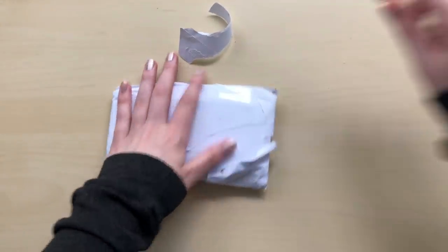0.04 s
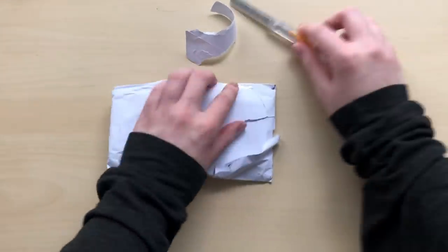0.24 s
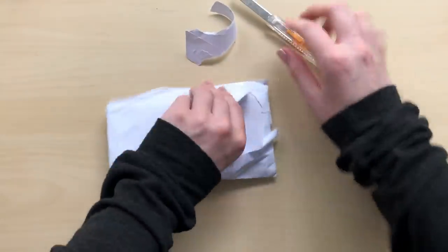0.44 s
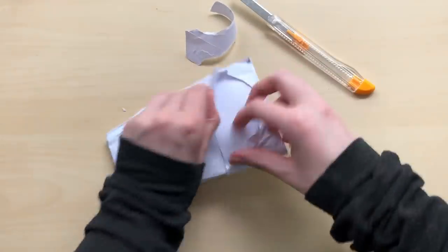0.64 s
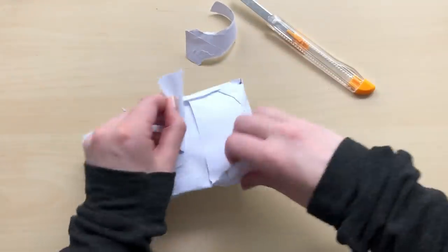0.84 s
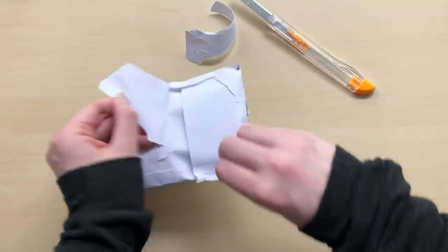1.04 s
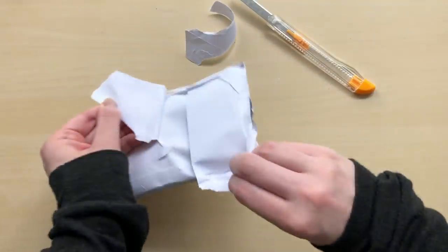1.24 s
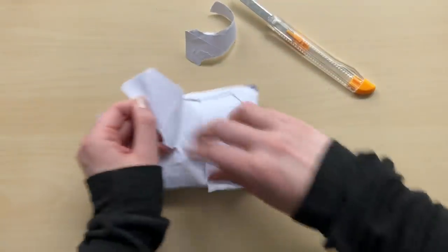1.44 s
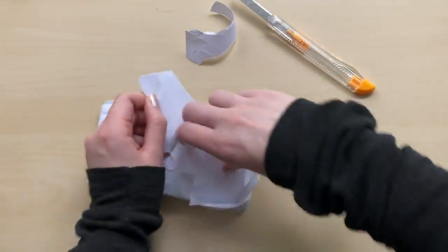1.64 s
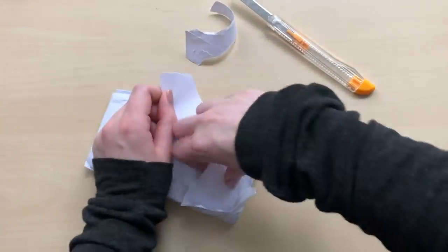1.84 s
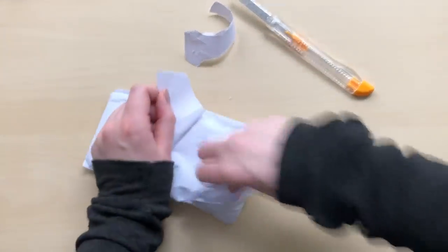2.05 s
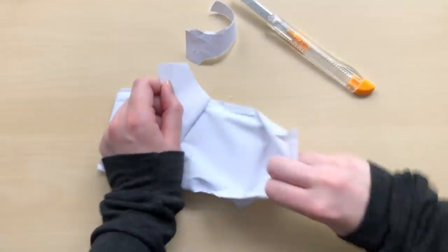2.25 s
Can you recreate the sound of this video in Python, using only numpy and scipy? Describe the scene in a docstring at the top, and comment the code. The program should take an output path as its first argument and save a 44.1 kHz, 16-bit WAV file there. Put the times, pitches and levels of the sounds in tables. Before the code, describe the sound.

A paper mailer is torn open on a wooden desk after a plastic knife clatters down

```python
"""Opening a paper mailer at a desk

Hands tear open a paper mailer on a wooden desk in a small quiet room. Paper rustles and rips as dense
filtered clicks and snaps at its creases as sinking, noisy pops; packet and fingers knock the hollow desk
top, a bank of damped modes. A plastic knife drops on the desk and bounces: cracks, ringing modes, chatter."""
import sys
import numpy as np
from scipy import signal
from scipy.io import wavfile

SR = 44100
rng = np.random.default_rng(int(sys.argv[2]) if len(sys.argv) > 2 else 0)


def put_to_file(sound):
    """Save the sound as 16-bit audio at rate SR, in the file named by the first command-line argument."""
    columns = np.atleast_2d(sound).T  # one column per channel
    safe = np.clip(columns, -1, 1)
    whole_steps = np.round(safe * 32767)
    wavfile.write(sys.argv[1], SR, whole_steps.astype(np.int16))


N = 101518   # samples


def amp(db):
    """Decibel law: level in dB to amplitude gain."""
    return 10 ** (np.asarray(db) / 20)


def rms_one(x):
    """Power normalisation: scale to rms 1."""
    return x / np.sqrt(np.mean(x ** 2) + 1e-20)


def drift(hz):
    """Low-passed noise: a smooth random wander of rms 1, by two equal poles at hz."""
    pole = np.exp(-2 * np.pi * hz / SR)
    settle = 9000   # samples dropped while the filter settles
    noise = rng.standard_normal(N + settle)
    return rms_one(signal.lfilter([1], [1, -2 * pole, pole * pole], noise)[settle:])


def ring(clicks, hz, t60):
    """Damped resonance: each unit click starts a sine that dies by 60 dB in t60 seconds."""
    radius = amp(-60 / (t60 * SR))
    angle = 2 * np.pi * hz / SR
    feedback = [1, -2 * radius * np.cos(angle), radius * radius]
    return signal.lfilter([0, np.sin(angle)], feedback, clicks + 1e-18)


def butter(x, hz, kind, order=2):
    """Maximally flat filtering: a Butterworth filter."""
    return signal.sosfilt(signal.butter(order, hz, kind, fs=SR, output="sos"), x)


def colour(sources, spectrum, patch_db):
    """Spectral shaping: third-octave bands, each with its own level and flicker; rms 1."""
    hz, db = np.transpose(spectrum)
    edges = 25 * 2 ** np.arange(0, 9.5, 1 / 3)
    out = 0
    for k, (low, high) in enumerate(zip(edges, edges[1:])):
        if hz[0] <= high and low <= hz[-1]:
            centre = np.log(low * high) / 2   # log of the geometric mean
            level = np.interp(centre, np.log(hz), db)
            flicker = patch_db * drift(52.3) if patch_db else 0
            # neighbouring bands take different sources
            out = out + amp(level + flicker) * butter(sources[k % 2], [low, high], "band")
    return rms_one(out)


def add(out, start, sound):
    """Superposition: mix a sound in at a sample."""
    out[start:start + len(sound)] += sound[:len(out) - start]


# spectrum of the quiet air: f/Hz, relative level per Hz/dB
AIR_SPECTRUM = [(15, -32), (25, -8), (123, -50), (206, 22), (2000, 11), (2760, 3.5), (3720, -23.5),
                (4030, 17.5), (16000, -6.5)]
AIR_DB, RUMBLE_DB = -64 + 4, -64   # rms
RUMBLE_BAND_HZ = [30, 120]


def quiet_air():
    """Stationary noise: a shaped hiss over a band of low rumble."""
    air = amp(AIR_DB) * colour(rng.standard_normal((2, N)), AIR_SPECTRUM, 0)
    rumble = rms_one(butter(rng.standard_normal(N), RUMBLE_BAND_HZ, "band"))
    return air + amp(RUMBLE_DB) * rumble


CRINKLES_PER_S, CRINKLE_SPREAD_DB = 400, 3
CRINKLE_CYCLES = 9.2   # cycles of ringing until 60 dB down


def crinkles():
    """Random excitation of resonators: small folds pop, each at one of 16 pitches; rms 1."""
    excess = np.minimum(rng.exponential(1, N), 4)
    sizes = amp(CRINKLE_SPREAD_DB * excess) * rng.choice([-1, 1], N)
    born = rng.random(N) < CRINKLES_PER_S / SR
    dealt = rng.integers(0, 16, N)   # which pitch each fold gets
    pops = 0
    for k, hz in enumerate(np.geomspace(700, 9000, 16)):
        pops = pops + ring(sizes * born * (dealt == k), hz, CRINKLE_CYCLES / hz)
    return rms_one(pops)


# pulls on the paper, each a rub or a rip:
# start t/s, length/s, starting body level/dB, starting treble level/dB, swell over the pull/dB
PULLS = [(.025, 0.0274, -61, -66.5, 10.5), (0.069, 0.1046, -48, -47, -6), (0.193, 0.1086, -49, -50, 6),
         (0.371, 0.0625, -48.5, -49, 17.5), (0.52, 0.116, -47.5, -50, -9),
         (.642, 0.0507, -49.5, -44.5, 10.5), (0.678, 0.0854, -41, -40.5, 0.5),
         (0.769, 0.06, -36, -33.5, -0.5), (0.829, 0.0323, -31.5, -29.5, 4),
         (0.882, 0.0365, -40.5, -41.5, 4), (0.909, 0.0609, -30, -29.5, -10.5),
         (1.008, 0.0086, -39, -42.5, 5.5), (1.033, 0.039, -44.5, -45, 7), (1.053, 0.1113, -33.5, -30, -9.5),
         (1.163, 0.1186, -40.5, -35, 7.5), (1.243, 0.0512, -32.5, -33, -6),
         (1.333, 0.072, -45, -42.5, -1.5), (1.402, 0.0374, -48, -45, 10.5),
         (1.464, 0.0496, -41.5, -46.5, -5), (1.55, 0.082, -50, -49, 6.5), (1.638, 0.013, -31, -26, -4.5),
         (1.656, 0.0633, -38, -43.5, -14), (1.713, 0.0405, -53, -57, 7), (1.762, 0.134, -41, -42.5, 0),
         (1.91, 0.0219, -39.5, -39, 3.5), (1.938, 0.099, -44.5, -45.5, 13.5),
         (2.057, 0.0192, -43.5, -36.5, 11.5), (2.073, 0.0403, -31.5, -30, 4),
         (2.122, 0.0328, -37.5, -41.5, 8), (2.166, 0.0565, -29, -28, 2), (2.245, 0.078, -37, -34.5, -9),
         (2.27, 0.0414, -29.5, -36.5, -3.5)]
# spectrum of the paper's body before the split: f/Hz, relative level per Hz/dB
BODY = [(88, -79.5), (150, -43.5), (290, 0), (352, -4), (598, -11.5), (969, -0.5), (1470, 3), (2270, 0.5),
        (7000, 6.5), (9100, -33.5), (15400, -120)]
# spectrum of the paper's treble before the split: f/Hz, relative level per Hz/dB
TREBLE = [(2650, -38), (4500, 19.5), (5680, 21.5), (8150, 7), (13900, -1), (16000, 8)]
SPLIT_HZ = 7660   # body below, treble above
GRAINS_PER_S, GRAIN_SPREAD_DB = 14000, 3.0   # rate in each of two streams
CLUMP_DB, CLUMP_HZ, PATCH_DB = 2.1, 140, 1.8   # rms wander of the grains, its corner, rms flicker per band
PULL_ATTACK_S, PULL_RELEASE_S = 0.00426, 0.0148   # linear rise, exponential time constant
CRINKLE_DB = -7.5   # relative to the body


def rustle():
    """Shot noise: fibres rub and break as dense, uneven, clumped clicks for as long as each pull lasts."""
    t = np.arange(N) / SR
    power = np.zeros((2, N))   # body, treble
    for start_s, length_s, body_db, treble_db, swell_db in PULLS:
        gone = np.clip(t - start_s, 0, length_s)
        attack = np.minimum(gone / PULL_ATTACK_S, 1)
        release = np.exp(-np.maximum(t - start_s - length_s, 0) / PULL_RELEASE_S)
        level = amp([[body_db], [treble_db]] + swell_db * gone / length_s)
        power += (level * attack * release) ** 2
    excess = np.minimum(rng.exponential(1, (2, N)), 6)
    sizes = amp(GRAIN_SPREAD_DB * excess) * rng.choice([-1, 1], (2, N))
    born = rng.random((2, N)) < GRAINS_PER_S / SR
    grains = sizes * born * amp(CLUMP_DB * drift(CLUMP_HZ))
    body = rms_one(butter(colour(grains, BODY, PATCH_DB), SPLIT_HZ, "low"))
    treble = rms_one(butter(colour(grains, TREBLE, PATCH_DB), SPLIT_HZ, "high"))
    body = body + amp(CRINKLE_DB) * crinkles()
    return np.sqrt(power[0]) * body + np.sqrt(power[1]) * treble


SNAP_RISE_S, SNAP_EDGE_S = .0005, .0013   # time constants
SNAP_SAG_PER_S = 22   # the pitch sinks by twice this fraction of itself each second
SNAP_GLIDE_HZ, SNAP_GLIDE_S = 1800, .0006   # the pitch starts this much higher; time constant of its fall
SNAP_NARROWNESS, SNAP_NOISE = 1.5, 1.1   # of the noise band; noise peak against tone
SNAP_TREBLE_HZ = 5500


def crack(start_s, db, hz, treble_db, length_s, noise):
    """Transient radiation: a noisy pop of falling pitch with a brief bright edge; start sample and sound."""
    t = np.arange(len(noise)) / SR
    rise = 1 - np.exp(-t / SNAP_RISE_S)
    fade = rise * np.exp(-2 * t / max(length_s, 5e-4))
    glide = SNAP_GLIDE_HZ * SNAP_GLIDE_S * (1 - np.exp(-t / SNAP_GLIDE_S))
    turns = hz * t * (1 - SNAP_SAG_PER_S * t) + glide
    tone = np.sin(2 * np.pi * turns) * (fade / fade.max()) ** 2
    band = [hz / (1 + 1 / SNAP_NARROWNESS), hz * (1 + 2 / SNAP_NARROWNESS)]
    hiss = butter(noise * fade, band, "band", order=1)
    body = tone + SNAP_NOISE * hiss / np.abs(hiss).max()
    edge = butter(noise * rise * np.exp(-t / SNAP_EDGE_S), SNAP_TREBLE_HZ, "high")
    pop = amp(db) * body / np.abs(body).max()
    return int(start_s * SR), pop + amp(treble_db) * edge / np.std(edge[:150])


# creases that snap: t/s, pop peak level/dB, settling f/Hz, bright edge rms level/dB, fade length/s
SNAPS = [(0.087, -31.5, 3793, -62.5, 0.0068), (0.105, -26, 1244, -56.5, 0.009),
         (0.145, -48.5, 1410, -56, 0.0021), (0.201, -37.5, 1280, -49, 0.0064),
         (0.227, -24.5, 854, -49, 0.009), (0.243, -29.5, 990, -58.5, 0.0013),
         (0.592, -38, 1010, -73.5, 0.0089), (0.64, -30.5, 982, -29.5, 0.0065),
         (0.652, -24.5, 1045, -49.5, 0.00384), (0.674, -21.5, 3090, -36, 0.00266),
         (0.698, -22, 1959, -26.5, 0.0043), (0.75, -32, 3040, -35, 0.0022),
         (0.787, -23.5, 1660, -31.5, 0.0059), (0.808, -31, 1640, -27.5, 0.0049),
         (0.818, -35, 750, -29.5, 0.00142), (0.834, -15.5, 4028, -23.5, 0.0028),
         (0.843, -25, 2310, -31, 0.001), (0.854, -15.5, 2083, -23.5, 0.0066),
         (0.889, -19, 4670, -33.5, 0.0042), (0.894, -22.5, 1287, -26.5, 0.0049),
         (0.902, -24.5, 920, -45.5, 0.00237), (0.926, -11, 867, -52.5, 0.00242),
         (0.969, -25.5, 3130, -33, 0.0035), (0.994, -35, 1060, -52.5, 0.0037),
         (1, -27.5, 886, -45.5, 0.0079), (1.013, -25.5, 690, -40.5, 0.0035),
         (1.015, -32.5, 1960, -34.5, 0.00136), (1.023, -27.5, 1018, -47, 0.009),
         (1.046, -17, 4270, -60, 0.00107), (1.058, -6.5, 935, -45, 0.00216),
         (1.097, -20, 904, -39.5, 0.009), (1.172, -15, 990, -54.5, 0.00824),
         (1.174, -36.5, 1106, -55.5, 0.0031), (1.227, -26, 3430, -26.5, 0.0032),
         (1.26, -14.5, 1210, -50.5, 0.00775), (1.268, -32, 1600, -41.5, 0.001),
         (1.297, -43, 1050, -32, 0.0023), (1.352, -31, 2030, -49.5, 0.0047),
         (1.439, -21.5, 1294, -61, 0.0082), (1.471, -14.5, 1611, -39, 0.00543),
         (1.574, -16.5, 723, -46, 0.0053), (1.643, -29, 647, -37, 0.0089),
         (1.658, -21.5, 1150, -37.5, 0.0048), (1.664, -17, 1033, -37, 0.0072),
         (1.683, -22, 1967, -51.5, 0.00293), (1.777, -36.5, 1480, -38.5, 0.001),
         (1.82, -34.5, 4170, -42.5, 0.0031), (1.839, -21, 953, -45.5, 0.0046),
         (1.869, -20.5, 929, -50.5, 0.007), (1.884, -24.5, 1300, -59.5, 0.00445),
         (1.902, -28.5, 1325, -35.5, 0.0031), (1.918, -27, 3570, -40, 0.009),
         (2.031, -24, 1220, -52, 0.002), (2.084, -13.5, 2420, -31, 0.0049),
         (2.096, -13.5, 1015, -37.5, 0.0023), (2.11, -20, 685, -30.5, 0.00283),
         (2.159, -11.5, 1965, -33, 0.00757), (2.175, -13.5, 1950, -26, 0.00546),
         (2.208, -13, 932, -29.5, 0.00372), (2.238, -14.5, 3410, -43.5, 0.0025),
         (2.274, -7, 882, -23, 0.003), (2.275, -16.5, 1908, -11.5, 0.0077)]


def snaps():
    """Buckling instability: creases give way one at a time, each as a pop."""
    out = np.zeros(N)
    for row, noise in zip(SNAPS, rng.standard_normal((len(SNAPS), 1500))):
        add(out, *crack(*row, noise))
    return out


# knocks on the desk top: t/s, strike level/dB, upper-mode level relative to the strike/dB
KNOCKS = [(0.145, -38.5, -4), (0.224, -37.5, -15), (0.322, -13.5, 2.5), (0.374, -24, -4),
          (0.424, -32.5, -8), (0.476, -30, -16), (0.528, -35, -8), (0.6, -41, -12), (0.857, -46.5, -16),
          (0.928, -36.5, -11.5), (1.004, -37.5, -2.5), (1.059, -35, 10), (1.44, -40, -12.5),
          (1.474, -27.5, -1), (1.576, -36, -15.5), (1.671, -21, -16), (1.841, -36, -7.5),
          (1.988, -38, -24.5), (2.074, -35, -17.5), (2.277, -33.5, -0.5)]
# low modes of the desk top: f/Hz, relative level/dB, 60 dB decay time t60/s
DESK_LOW = [(243, -10, 0.187), (278.46, -3.45, 0.1342), (308.14, -5, 0.0936), (424.6, -17.5, 0.107)]
# upper modes of the desk top: f/Hz, relative level/dB, 60 dB decay time t60/s
DESK_UPPER = [(775, -4, .045), (850, -3, .035), (975, -.1, .04), (1324, -16, .03), (1663, -14, .02)]
# fingers landing softly: t/s, strike level/dB, f/Hz
THUMPS = [(0.323, -47.5, 100), (1.063, -43, 100), (1.476, -26.5, 103.9), (1.577, -43, 100),
          (1.686, -29.5, 98), (2.099, -62, 100)]
DESK_BAND_HZ = [254, 2160]
THUMP_T60_S, THUMP_SOFT_HZ = 0.0356, 200


def desk():
    """Modal superposition: knocks ring low and upper modes of the top; fingers add a dull thump."""
    low, upper, soft = np.zeros((3, N))
    for start_s, db, upper_db in KNOCKS:
        at = int(start_s * SR)
        low[at] = amp(db)
        upper[at - 60] = amp(db + upper_db)   # the upper modes start 60 samples earlier
    for start_s, db, hz in THUMPS:
        click = np.zeros(N)
        click[int(start_s * SR)] = amp(db)
        soft += ring(click, hz, THUMP_T60_S)
    rings = np.zeros(N)
    for hz, db, t60 in DESK_LOW:
        rings += amp(db) * ring(low, hz, t60)
    for k, (hz, db, t60) in enumerate(DESK_UPPER):
        rings += (-1) ** k * amp(db) * ring(upper, hz, t60)   # signs alternate
    return butter(rings, DESK_BAND_HZ, "band", order=3) + butter(soft, THUMP_SOFT_HZ, "low")


# landings of the knife: t/s, first touch level/dB, delay of second touch/s, second touch level/dB,
# crack level before halving and filtering/dB
DROPS = [(0.3179, -27.5, .0012, -10.5, -8), (0.3536, -4, 0.001262, -6.5, -14),
         (0.4688, -9, .0028, -6.5, -23.5), (0.5132, -30, 0.00933, -25, -37)]
# modes of the knife: f/Hz, relative level/dB, 60 dB decay time t60/s
KNIFE_MODES = [(1220, -14, .02), (2050, -15, .015), (2650, -7, .016), (3100, -15, .012), (3400, -14, .012),
               (4097, -6, .02), (4330, -7, .014), (4700, -11, .01), (5110, -7, .016), (5650, -11, .01),
               (6290, -15, .01), (7200, -15, .008), (8400, -18, .006), (10500, -19, .005)]
KNIFE_RING_DB, KNIFE_LOW_CUT_HZ = -5, 366   # too small to radiate bass
CRACK_LOW_HZ, CRACK_S = 2040, 0.00377   # low cut, time constant
RATTLES_PER_S, RATTLE_DB, RATTLE_T60_S = 2500, -15, .15   # level relative to the second touch


def knife():
    """Impact excitation: two touches per landing crack and strike the modes; then the loose blade chatters."""
    t = np.arange(N) / SR
    cracks, touches, chatter = np.zeros((3, N))
    for start_s, db, after_s, second_db, crack_db in DROPS:
        second_s = start_s + after_s
        touches[[int(start_s * SR), int(second_s * SR)]] = amp([db, second_db])
        decay_db = -60 * np.abs(t - start_s) / RATTLE_T60_S
        chatter += (t > start_s) * amp(second_db + RATTLE_DB + decay_db)
        for at in (start_s, second_s):
            cracks += (t > at) * amp(crack_db) * np.exp(-np.abs(t - at) / CRACK_S)
    out = butter(cracks * rng.standard_normal(N) / 2, CRACK_LOW_HZ, "high")
    hits = rng.random(N) < RATTLES_PER_S / SR
    for k, (hz, db, t60) in enumerate(KNIFE_MODES):
        strength = rng.standard_normal(N)   # every mode takes each blow differently
        blows = touches * amp(2 * strength) + chatter * hits * strength
        out += (-1) ** k * amp(db + KNIFE_RING_DB) * ring(blows, hz, t60)
    return butter(out, KNIFE_LOW_CUT_HZ, "high")


ROOM_T60_S, ROOM_DB, WALL_CUT_HZ = 0.163, -18, 12230   # decay, gain on the echoes, low-pass on each round


def room(x):
    """Reverberation by recirculation: ten short feedback delays, duller on every round."""
    out = np.zeros(N)
    dull = np.exp(-2 * np.pi * WALL_CUT_HZ / SR)
    for k, lag in enumerate((np.geomspace(.005, .023, 10) * SR).astype(int)):
        loop, state = x.copy(), [0.]
        gain = amp(-60 * lag / SR / ROOM_T60_S)
        for i in range(lag, N, lag):
            back, state = signal.lfilter([gain * (1 - dull)], [1, -dull], loop[i - lag:i], zi=state)
            loop[i:i + lag] += back[:N - i]
        out += (loop - x) * (-1) ** k   # echoes only
    return out


def scene():
    """Linear superposition: paper, desk and knife with their room echoes, over the quiet air."""
    near = rustle() + snaps() + desk() + knife()
    return (near + amp(ROOM_DB) * room(near) + quiet_air())[None]


MIC_LOW_CUT_HZ, CUTOFF_HZ = 53.6, 16200


def record(dry):
    """Band limitation: the microphone drops the lowest bass; a steep filter cuts the top."""
    thin = butter(dry, MIC_LOW_CUT_HZ, "high")
    return signal.sosfilt(signal.cheby2(16, 60, CUTOFF_HZ, fs=SR, output="sos"), thin)


dry = scene()
out = record(dry)
put_to_file(out)
```